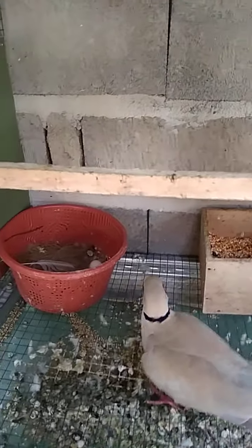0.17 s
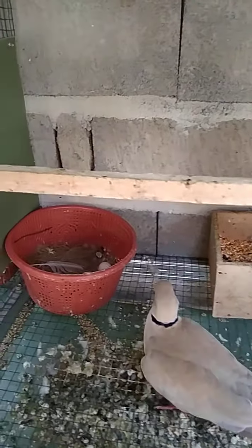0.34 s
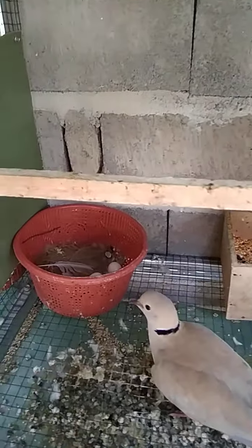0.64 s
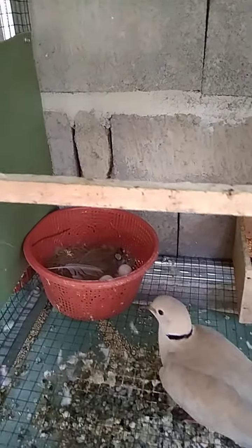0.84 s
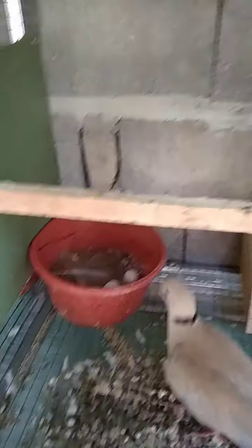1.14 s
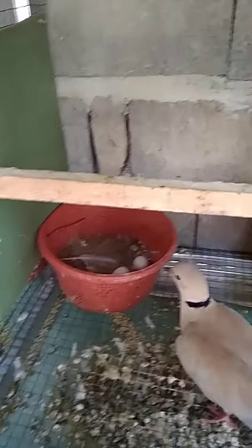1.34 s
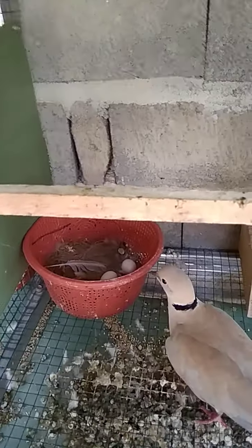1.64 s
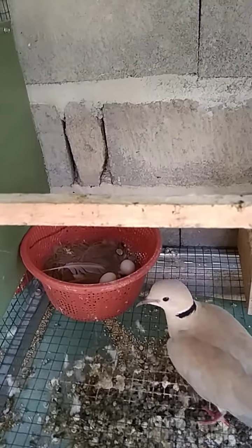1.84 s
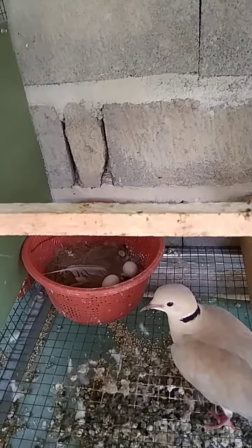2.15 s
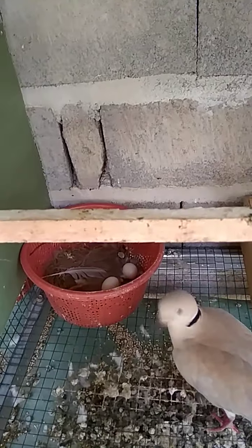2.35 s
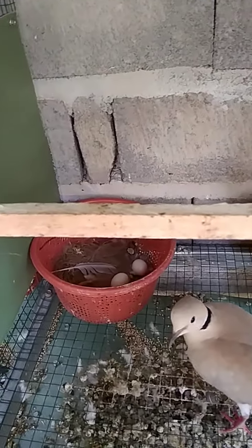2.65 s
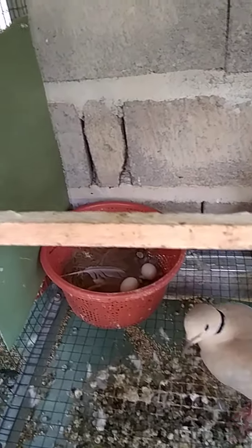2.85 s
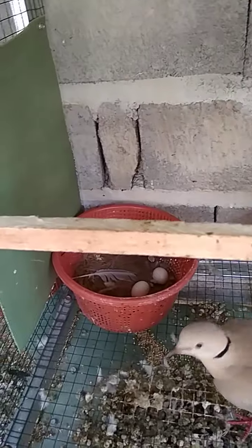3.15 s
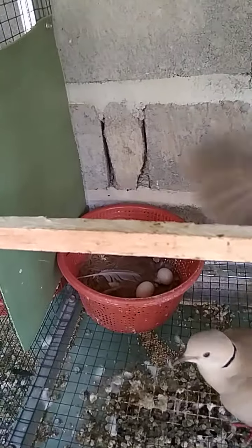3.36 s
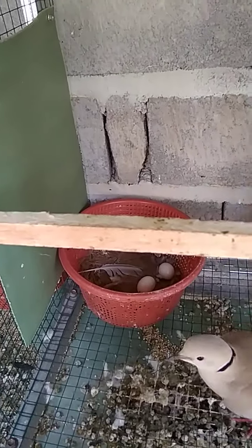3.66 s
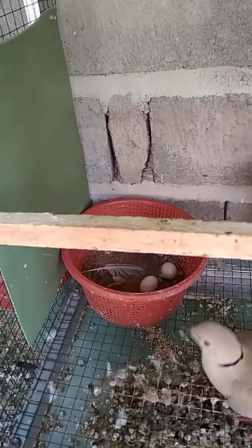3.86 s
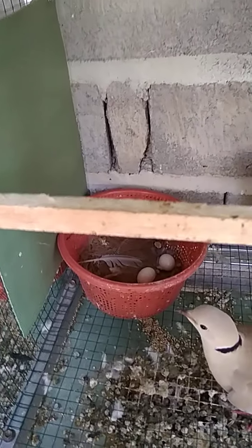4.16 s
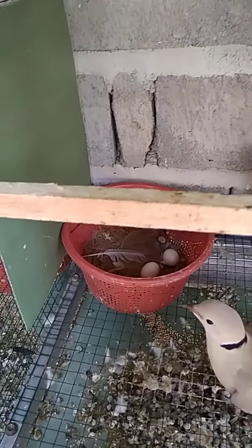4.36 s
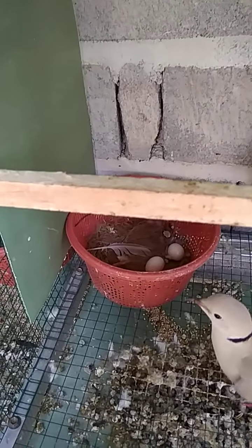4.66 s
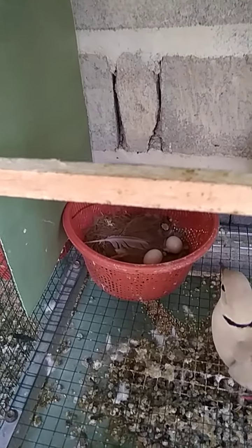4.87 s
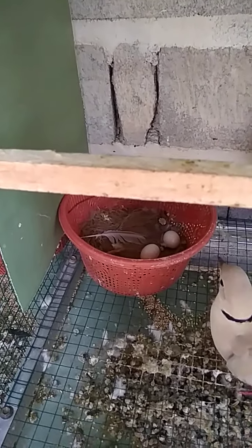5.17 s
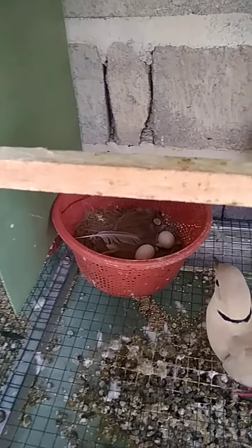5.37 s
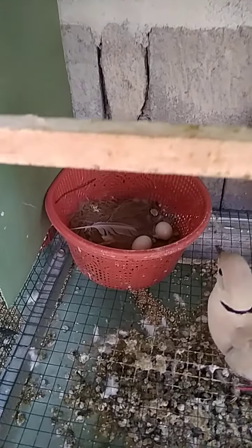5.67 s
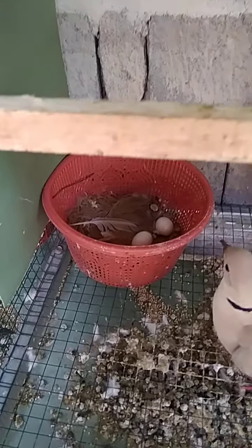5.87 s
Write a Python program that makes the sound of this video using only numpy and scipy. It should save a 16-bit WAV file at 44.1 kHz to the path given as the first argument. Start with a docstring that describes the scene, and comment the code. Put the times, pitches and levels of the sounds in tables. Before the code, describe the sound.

Doves shuffle in a wire cage, feathers hissing and claws clicking on mesh, one hard wing flurry, brief bird chirps and a distant coo.

```python
"""Doves shuffle in a wire cage in a walled yard, close and from the left, over a low air push and a far murmur.
From the start feathers hiss in bursts (crackling noise), claws click on the mesh (short damped rings), bodies
ring the cage and wing draughts thump low (resonated noise); soon a small bird chirps (gliding tone and buzz).
At 1.6 s a far dove coos (unsteady tone with weak overtones); the wings beat hardest at 3.2 s. The chirp
returns at 4.1 s, and from 4.6 s another bird whistles faintly (swelling glides)."""
import sys
import numpy as np
from scipy import signal
from scipy.io import wavfile

SR = 44100
rng = np.random.default_rng(int(sys.argv[2]) if len(sys.argv) > 2 else 0)


def log_audio(samples):
    """Write samples as a 16-bit WAV file to the path given in sys.argv[1]."""
    # one column per channel
    frames = np.atleast_2d(samples).T
    # limit to full scale, then quantise
    limited = np.clip(frames, -1, 1)
    pcm = np.round(limited * 32767).astype(np.int16)
    wavfile.write(sys.argv[1], SR, pcm)


N = 264952

# Noise spectrum of feathers. Each row: pitch in Hz, relative density in dB.
FEATHER_COLOUR = [(880, -39), (1500, -9), (2110, -0.5), (3930, -5.5), (4800, -5), (5580, -11), (8510, -3),
                  (10600, -0.5), (11500, -3.5), (12500, -4), (15500, -9.5), (16000, -9), (16500, -31)]
# Wing strokes and claw ticks. Each row: start in seconds, level in dB, hold in seconds, t60 in seconds, then
# against that level: body on the cage in dB, dull part in dB, tick in dB.
WING_STROKES = [(.06, -60.5, 0.02, 0.23, 0.5, -12, -13), (.091, -69.5, 0.0051, 0.48, 10.5, -5, 12.5),
                (.232, -67.5, 0.032, 0.56, -21, -19, -10), (0.278, -71, 0.01, .24, -31.5, -26, 10),
                (0.7062, -45, .012, 0.33, -10.5, -9.5, -5), (0.8471, -47.5, 0.0047, 0.25, -1.5, -6.5, -2),
                (1.198, -95.5, 0.0084, 0.47, 2, 24, 8), (1.338, -68.5, 0.017, 0.28, -4, -37.5, 2),
                (1.528, -65, .007, 0.23, -24, -34, 10), (1.6, -54.5, 0.0075, 0.24, -43, -6.5, 2),
                (1.8964, -77.5, 0.016, .3, -12.5, -39, 2), (2.0677, -74.5, 0.0088, 0.9, 8.5, -21, -10),
                (2.278, -62.5, 0.0065, 0.47, -21, -9, 7.5), (2.375, -68, .008, 0.77, 8.5, -6, 11),
                (2.6608, -64.5, 0.012, 0.86, -4.5, -8.5, -43), (2.715, -55.5, 0.0087, 0.55, -3, -6.5, 7.5),
                (2.795, -56, 0.026, 0.2, -9, -8, -8), (2.868, -54, .008, .2, -10, -8, -20),
                (2.875, -46.5, 0.011, 0.32, -5.5, -10.5, -20), (2.937, -50.5, 0.015, 1, -7, -4, -16),
                (3.0873, -52, .03, 0.75, -6, -27, 7), (3.172, -31, 0.026, 0.092, -14.5, -8.5, -8.5),
                (3.189, -27.5, 0.0065, 0.045, -20.5, -24, -11.5),
                (3.1946, -29, 0.008, 0.037, -28, -26, -20), (3.2293, -38.5, 0.037, 0.14, -6.5, -7, -5),
                (3.2714, -44, 0.0075, 0.27, 1.5, -3, -3), (3.306, -42.5, 0.017, 0.17, -18, -13.5, -3),
                (3.39, -64.5, 0.0094, 0.13, 11.5, 5.5, 1), (3.4033, -67, 0.0046, 0.85, -18.5, -15, 26),
                (3.455, -60, 0.026, .3, -12, -9, -20), (3.5345, -38.5, 0.0069, 0.21, -10, -11.5, -1),
                (3.694, -55, 0.004, 0.15, -22, -13, 12), (3.7055, -57.5, .003, .2, -20, -16, 16),
                (3.7306, -50.5, 0.0094, 0.29, 0.5, -7.5, -10), (3.8332, -66.5, 0.0064, 0.098, -21, -37, 17),
                (3.8866, -45.5, 0.0032, 0.078, -6, -9, 17), (3.929, -51, 0.0044, 0.22, -5, -12.5, -2),
                (4.019, -54.5, 0.0096, 0.5, 2, -8.5, -5), (4.0718, -50, 0.0052, 0.28, -4, -6, -5),
                (4.3242, -42.5, 0.023, 0.58, -4, -8.5, 11.5), (4.375, -45, 0.0089, 0.26, -5, -9.5, 11),
                (4.458, -51.5, 0.017, 0.096, -1.5, -5, 6), (4.561, -51.5, .006, 0.52, -26, -38, -8),
                (4.797, -55.5, 0.018, 0.24, -12.5, -6.5, 1), (5.0, -71, 0.03, 0.61, -30.5, -34, -30),
                (5.033, -54, 0.033, 0.193, -29, -32, -3), (5.0516, -51, 0.025, 0.3, -0.5, -3, -22),
                (5.0865, -77, 0.014, 0.35, -2, 3, -5.5), (5.1523, -55, 0.0078, 0.18, -2.5, -10, 3.5),
                (5.445, -66.5, 0.007, 0.26, -21, -32, 18.5), (5.7034, -56, 0.025, 0.4, -17.5, -13, -7.5),
                (5.8609, -57, .01, 0.4, -1.5, -13, 8), (5.9346, -58, 0.0063, 0.2, -2.5, -10, 10)]
# Knocks on the cage. Each row: start in seconds, body level in dB, body t60 in seconds, slat pitch in Hz,
# slat ring level in dB.
CAGE_KNOCKS = [(0.711, -54.5, 0.58, 830, -50), (1.199, -72, 0.22, 1282, -46),
               (1.393, -71.5, 0.78, 674, -44), (2.945, -54.5, .6, 866, -54), (2.984, -44, 0.67, 872, -41.5),
               (3.179, -38.5, 0.26, 489, -24), (3.226, -57, 0.24, 488, -27), (3.886, -56.5, .12, 2007, -43),
               (4.323, -70.5, .1, 2130, -45), (4.326, -59.5, 0.2, 573, -44.5),
               (4.807, -60, 0.45, 1492, -54), (5.046, -51.5, 0.42, 598, -53),
               (5.056, -50.5, 0.4, 1146, -42), (5.062, -54, 0.4, 1494, -42), (5.07, -63, 0.33, 843, -46.5),
               (5.398, -88, 0.17, 846, -71), (5.478, -74, 0.42, 857, -54), (5.488, -66.5, .2, 1095, -50.5),
               (5.782, -79, 0.36, 871, -66), (5.871, -57.5, 0.31, 690, -43.5)]


def amp(db):
    """Gain of a dB value."""
    return 10 ** (np.asarray(db) / 20)


def unit(x):
    """Scale to rms 1."""
    return x / np.sqrt(np.mean(x ** 2) + 1e-20)


def in_time(rows):
    """Columns of a curve table, interpolated to one value a sample."""
    s, *columns = np.transpose(rows)
    return [np.interp(np.arange(N) / SR, s, c) for c in columns]


def sounding(rows):
    """1 within the time span of a table, 0 outside, with 40 ms ramps."""
    t = np.arange(N) / SR
    return np.clip(np.minimum(t - rows[0][0], rows[-1][0] - t) / 0.04, 0, 1)


def at_hz(points, hz):
    """Read a spectrum on a log-frequency axis."""
    point_hz, values = np.array(points).T
    return np.interp(np.log(hz), np.log(point_hz), values)


def drift(rate_hz):
    """Slow random curve of spread 1: noise through two poles at rate_hz, drawn every 40 samples."""
    r = np.exp(-80 * np.pi * rate_hz / SR)
    noise = rng.standard_normal(N // 40 + 1002)
    slow = signal.lfilter([1], [1, -2 * r, r * r], noise)[1000:]
    return np.interp(np.arange(N) / 40, np.arange(len(slow)), unit(slow))


def phase_of(hz):
    """Phase in radians of a tone whose pitch moves."""
    return 2 * np.pi * np.cumsum(hz) / SR


def lean(db):
    """Left and right gains for a left-right difference."""
    return amp(np.array([db / 2, -db / 2]))


def bandpass(x, order, low_hz, top_hz):
    """Butterworth band-pass."""
    return signal.sosfilt(signal.butter(order, [low_hz, top_hz], "band", fs=SR, output="sos"), x)


def modes(x, table):
    """Parallel resonances with alternating signs, scaled to rms 1."""
    out = 0
    for k, (hz, width_hz, db) in enumerate(table):
        r = np.exp(-np.pi * width_hz / SR)
        poles = [1, -2 * r * np.cos(2 * np.pi * hz / SR), r * r]
        out = out + (-1) ** k * amp(db) * signal.lfilter([1 - r, 0, r - 1], poles, x)
    return unit(out)


def stereo_noise(hz):
    """Two white noises with the left-right likeness and level difference set for that pitch."""
    # Each row: pitch in Hz, left-right correlation.
    likeness = [(60, 1), (180, 1), (550, 0.31), (1100, 0.021), (1900, -0.13), (4970, -0.0042),
                (15000, -0.0)]
    # Each row: pitch in Hz, left-right difference in dB.
    leaning = [(40, 8), (110, 5.5), (200, 6), (380, 4.5), (700, 9), (1290, 8), (2380, 5.5), (4400, 3.5),
               (8120, 6), (15000, 0)]
    mid, side = rng.standard_normal((2, N))
    alike = np.clip(at_hz(likeness, hz), -1, 1)
    pair = np.sqrt(1 + alike) * mid + np.sqrt(1 - alike) * side * [[1], [-1]]
    return pair * lean(at_hz(leaning, hz))[:, None]


def banded(spectrum, low_hz, top_hz, patchy_db, rate_hz, per_octave=3, sheen_db=0.):
    """Bands of stereo noise, each flickering on its own; left-right mean scaled to spread 1."""
    edges = np.geomspace(low_hz, top_hz, round(per_octave * np.log2(top_hz / low_hz)) + 1)
    out = 0
    for a, b in zip(edges, edges[1:]):
        hz = np.sqrt(a * b)
        band = bandpass(stereo_noise(hz), 3, a, b)
        tilt_db = sheen_db * np.log2(hz / 9000)
        out = out + band * amp(at_hz(spectrum, hz) + patchy_db * drift(rate_hz) + tilt_db)
    return out / np.std(out.mean(axis=0))


def burst(s, db, t60, held=0., rise=0.0011):
    """Envelope of one event: quick rise, hold, exponential fall; times in seconds."""
    out, first = np.zeros(N), round(s * SR)
    t = np.arange(min(N - first, round((held + t60) * SR))) / SR
    fall_db = -60 * np.maximum(t - held, 0) / t60
    out[first:first + len(t)] = amp(db + fall_db) * np.clip(t / rise, 0, 1)
    return out


def swell(s, length, peak_at=0.51):
    """Smooth rise and fall of height 1 from s on; peak_at is a share of the length."""
    u = np.clip((np.arange(N) / SR - s) / length, 0, 1)
    bend = np.log(.5) / np.log(np.clip(peak_at, .05, .95))
    return np.sin(np.pi * u ** bend) ** 2


def slat(s, db, hz, t60):
    """A struck slat or wire: one short damped ring."""
    t = np.arange(N) / SR - s
    return burst(s, db, t60, rise=0.0012) * np.sin(2 * np.pi * hz * t)


def echoes(x, t60, wet_db):
    """Walls of the yard: a dense dying spray of reflections, another for each ear."""
    t = np.arange(round(.4 * SR)) / SR
    spray = rng.standard_normal((2, len(t))) * amp(-60 * t / t60)
    spray = amp(wet_db) * spray / np.sqrt(np.sum(spray ** 2, axis=1, keepdims=True))
    return x + signal.fftconvolve(x[None], spray, axes=1)[:, :N]


def murmur():
    """Far murmur of the yard as flickering noise: its body and its thin upper fringe."""
    # Each row: time in seconds, body level in dB before the cage, fringe level in dB.
    murmur_curve = [(0, -59.5, -74.5), (.15, -76, -76), (.38, -56.5, -108), (.62, -65.5, -70),
                    (.83, -60.5, -63), (1.02, -70, -83), (1.25, -81.5, -106.5), (1.36, -54.5, -100),
                    (1.62, -68, -91), (1.82, -60.5, -89), (2.15, -58, -73.5), (2.39, -63.5, -77),
                    (2.69, -53.5, -85), (2.87, -54, -73), (3.2, -57, -72), (3.5, -64, -83),
                    (3.71, -62, -65.5), (3.98, -65, -89), (4.3, -57.5, -82), (4.7, -63, -79.5),
                    (4.89, -65, -80), (5.04, -99, -100), (5.75, -97.5, -100.5), (5.89, -66, -98),
                    (6.01, -67.5, -93)]
    # Each row: pitch in Hz, relative density in dB.
    murmur_colour = [(330, -51), (560, -21), (608, -8.5), (735, -6.5), (937, -7), (1460, -7.5), (1570, -16),
                     (1900, -7.5), (2300, -11.5), (2990, -57), (5060, -120)]
    body_db, fringe_db = in_time(murmur_curve)
    body = amp(body_db) * banded(murmur_colour, 594.0, 2076, patchy_db=4.5, rate_hz=14, per_octave=6)
    fringe = amp(fringe_db) * banded(FEATHER_COLOUR, 2050, 3600, patchy_db=4.0, rate_hz=12, per_octave=6)
    return body, fringe


def whistles():
    """Thin distant notes, each a glide that levels off, under one swell."""
    # Each row: start in seconds, length in seconds, first pitch in Hz, last pitch in Hz, level in dB.
    notes = [(4.64, .09, 3110, 3080, -82), (4.708, 0.097, 2860, 2830, -75), (5.366, 0.069, 3270, 3260, -89),
             (5.437, 0.178, 2806, 2607, -69), (5.608, 0.08, 3000, 3120, -86),
             (5.711, 0.081, 3330, 3300, -77), (5.789, 0.077, 4000, 3900, -78)]
    peaks_at, glides_for = 0.21, 0.42   # shares of the length
    out = np.zeros(N)
    for s, length, first_hz, last_hz, db in notes:
        hz, = in_time([(s, first_hz), (s + glides_for * length, last_hz)])
        tone = np.sin(phase_of(hz * (1 + 0.022 * drift(120))))
        out += amp(db) * tone * swell(s, length, peaks_at)
    return echoes(out, t60=0.2, wet_db=8) * lean(10.4)[:, None]


def coo():
    """A hollow, slightly unsteady held tone with weak overtones and, at times, a tone half-way between."""
    # Each row: time in seconds, pitch in Hz, level in dB, overtones in dB, tone at 3/2 of the pitch in dB.
    coo_curve = [(1.615, 730, -85, -90, -67), (1.636, 719, -65, -89, -52), (1.656, 729.6, -52, -64, -79),
                 (1.712, 737, -47, -63, -70), (1.745, 721, -56, -61, -81), (1.8, 731, -55, -62, -67),
                 (1.85, 713, -58, -65, -67), (1.89, 727, -61, -67, -68), (1.92, 746, -46, -67, -66),
                 (1.945, 725, -55, -70, -74), (1.975, 725, -43.5, -58, -65), (1.997, 725, -68, -68, -71),
                 (2.034, 701, -46.5, -61, -73), (2.06, 739, -66, -63, -74), (2.14, 748, -57, -70, -71)]
    hz, db, octave_db, half_db = in_time(coo_curve)
    phase = phase_of(hz * (1 + 0.012 * drift(33)))
    breath = .6 * drift(60)   # air noise blurs the overtones
    tone = amp(db + 1.2 * drift(30)) * np.sin(phase)
    overtones = np.sin(2 * phase + breath) + amp(-9.0) * np.sin(3 * phase + 2 * breath)
    tone += amp(octave_db) * overtones
    tone += amp(half_db) * np.sin(3 * phase / 2)
    return echoes(tone * sounding(coo_curve), t60=0.45, wet_db=-5.5) * lean(7.8)[:, None]


def chirps():
    """Two sides of the throat: one sings the tune, the other buzzes about it; both throb, and echoes follow."""
    # Each row: seconds after the start, pitch in Hz and level in dB the first time, the same the second time.
    tune = [(-.01, 3342, -54, 3310, -50), (.012, 3692, -53.5, 3318, -53.5), (.027, 4206, -49.5, 3476, -61),
            (.038, 3363, -54.5, 3577, -52.5), (.048, 3890, -51.5, 4130, -50.5),
            (.068, 4470, -38.5, 4312, -42), (.081, 2620, -54, 2628, -51), (0.092, 2956, -46.5, 2877, -45),
            (0.103, 3328, -39.5, 3370, -38.5), (0.119, 3268, -36, 3282, -37),
            (.126, 3990, -36.5, 4093, -41), (.141, 4118, -38.5, 4286, -38.5),
            (.152, 3637, -43, 3770, -36.5), (.168, 3191, -38, 3156, -46.5), (.182, 2814, -47, 2743, -46),
            (.189, 3370, -35.5, 3677, -40.5), (0.204, 3346, -44.5, 3590, -35),
            (.222, 3230, -39.5, 3404, -46), (0.244, 3150, -68.5, 3050, -53), (0.261, 3280, -46, 3230, -48),
            (.287, 3220, -58, 3280, -52)]
    # The two starts in seconds.
    starts_s = [0.41, 4.061]
    buzz_db, octave_db = -7, -25   # against the tune
    rasp_hz, rasp_depth = 230, .5
    chirp_low_hz, chirp_top_hz = 2620, 4650   # band of tune and buzz
    voices, octave = np.zeros((2, N))
    for k, s in enumerate(starts_s):
        rows = np.array(tune)[:, [0, 1 + 2 * k, 2 + 2 * k]] + [s, 0, 0]
        hz, db = in_time(rows)
        phase = phase_of(hz * (1 + 0.014 * drift(150)))
        warble = np.sin(phase_of(60 * (1 + 0.21 * drift(20))))
        buzz = np.sin(phase_of(.4 * hz + 2150 + 620 * warble))
        rasp = 1 + rasp_depth * np.sin(phase_of(rasp_hz * (1 + .3 * drift(60))))
        gain = amp(db - 0.2 + 0.96 * drift(90)) * rasp * sounding(rows)
        voices += gain * (np.sin(phase) + amp(buzz_db) * buzz)
        octave += gain * amp(octave_db) * np.sin(2 * phase + 2 * drift(200))
    voices = bandpass(voices, 8, chirp_low_hz, chirp_top_hz)
    return echoes(voices + octave, t60=0.22, wet_db=4) * lean(6.2)[:, None]


def rumble(touch):
    """Low air push, and the cage's boom and thud, as noise; wing draughts and bodies raise their power."""
    # Each row: time in seconds, level in dB.
    air_curve = [(0.0, -67.5), (0.32, -49), (0.48, -77), (0.85, -65), (1.1, -80.5), (1.82, -67.5),
                 (2.31, -54), (2.86, -60.5), (3.38, -58.5), (3.86, -65.5), (4.07, -64), (4.3, -59),
                 (5.17, -82.5), (5.74, -83), (5.92, -71), (6.01, -68)]
    # Each row: pitch in Hz, relative density in dB.
    air_colour = [(12, -42), (24, -24.5), (45, -14.5), (91, -14.5), (110, -7.5), (140, -31), (240, -120)]
    # Each row: time in seconds, upper boom in dB, lowest standing wave against it in dB.
    boom_curve = [(0, -71.5, 3), (.32, -62.5, -14.5), (.55, -69, -4), (.93, -74, 1.5), (1.2, -77.5, -12),
                  (1.45, -81.5, -3), (1.78, -67, -31.5), (2.02, -62, 8.5), (2.2, -55, -6.5),
                  (2.6, -56, -9.5), (2.81, -55, -19), (3.21, -42.5, -17), (3.6, -51.5, -8.5),
                  (3.96, -62, -7.5), (4.1, -58.5, -3.5), (4.43, -51, -10), (4.67, -61, 2), (4.8, -60.5, -1),
                  (4.93, -91, -1.5), (5.15, -74.5, -1), (5.35, -90.5, -3.5), (5.69, -88.5, -4),
                  (6.01, -71.5, 2)]
    # Wing draughts. Each row: middle in seconds, length in seconds, then levels in dB of air, lowest standing
    # wave, upper boom and thud.
    draughts = [(0.153, 0.074, -51, -60, -53.5, -70), (0.301, 0.24, -44.5, -54, -80, -73),
                (0.447, 0.18, -57.5, -61, -63.5, -68), (0.787, 0.52, -74.5, -62, -86.5, -86),
                (1.003, 0.2, -82.5, -76, -55, -70.5), (1.392, 0.43, -78, -88, -63, -73),
                (1.921, 0.28, -67, -52, -57.5, -99), (2.132, 0.15, -56, -72, -52.5, -91),
                (2.359, 0.55, -63, -47, -67, -96), (2.695, 0.12, -60, -69, -50, -67),
                (2.865, 0.23, -54, -56, -54, -83), (3.068, 0.33, -69, -54, -43.5, -51.5),
                (3.202, 0.2, -50, -59, -34, -49), (3.326, 0.14, -50, -45.5, -42, -53),
                (3.54, 0.19, -70, -68, -68, -57), (3.715, 0.24, -63, -70, -52.5, -61.5),
                (4.016, 0.036, -68, -55, -48, -85), (4.307, 0.4, -54, -60, -49, -57),
                (4.391, 0.16, -72, -34.5, -50, -52), (4.492, 0.23, -57, -65, -60, -51.5),
                (4.7, 0.13, -56, -57.5, -66, -62), (5.111, 0.18, -68.5, -58, -64.5, -72),
                (5.82, 0.32, -64.5, -70.5, -84, -97), (6.008, 0.055, -46, -56, -80, -80)]
    # Resonances. Each row: pitch in Hz, width in Hz at one pass, level in dB.
    lowest_mode = [(131.2, 12, 0)]
    upper_modes = [(160.2, 24, 9), (252, 56, 4), (307, 68, -1), (373, 54, -6)]
    thud_modes = [(415.8, 57, 1), (490.2, 11, 5), (535.5, 45, -0.5)]
    lumps_db, lumps_hz = 2, 3.6
    thud_to_boom_db, thud_to_body_db = -25.5, -13

    air_db, = in_time(air_curve)
    boom_db, lowest_db = in_time(boom_curve)
    lumpy_db = [boom_db + lumps_db * drift(lumps_hz) for _ in range(2)]
    power = amp([air_db, lumpy_db[0] + lowest_db, lumpy_db[1], boom_db + thud_to_boom_db]) ** 2
    for middle_s, length, *db in draughts:
        power += (amp(db)[:, None] * swell(middle_s - length / 2, length)) ** 2
    air_gain, lowest_gain, upper_gain, thud_gain = np.sqrt(power)
    thud_gain = np.hypot(thud_gain, amp(thud_to_body_db) * touch)

    air = air_gain * banded(air_colour, 22, 108.9, patchy_db=3.0, rate_hz=7.7)
    lowest = lowest_gain * modes(modes(stereo_noise(180), lowest_mode), lowest_mode)
    upper = upper_gain * bandpass(modes(stereo_noise(250), upper_modes), 3, 150, 420)
    thud = thud_gain * modes(modes(stereo_noise(550), thud_modes), thud_modes)
    return air + lowest + upper + thud


def contacts():
    """Envelope of bodies against the mesh: powers of strokes and knocks add."""
    power = np.zeros(N)
    for s, db, held, t60, body_db, *_ in WING_STROKES:
        power += burst(s, db + body_db, t60, held, rise=0.0052) ** 2
    for s, db, t60, *_ in CAGE_KNOCKS:
        power += burst(s, db, t60, rise=0.0029) ** 2
    return np.sqrt(power)


def cage(touch):
    """Murmur, bodies on the mesh and struck slats all ring the standing waves of the cage."""
    # Body noise. Each row: pitch in Hz, relative density in dB.
    body_colour = [(220, -34), (380, -13), (493, -3.5), (564, -9.5), (810, -8), (876, -3.5), (948, -8.5),
                   (2500, -9.5), (3250, -44), (5500, -120)]
    # Standing waves between the walls. Each row: pitch in Hz, width in Hz, level in dB.
    standing_waves = [(474.6, 8.6, -5.5), (627, 16, 6), (745.7, 34, -2), (881.8, 18, 7.5), (998, 15, 0),
                      (1135, 43, 3), (1250, 260, -10), (1456, 140, 1.5), (1830, 120, -10.5),
                      (2230, 200, -7)]
    slat_t60_s = 0.053
    rings = sum(slat(s, ring_db, hz, slat_t60_s) for s, _, _, hz, ring_db in CAGE_KNOCKS)
    far, fringe = murmur()
    bodies = touch * banded(body_colour, 557, 2155, patchy_db=1.5, rate_hz=15)
    direct = far + bodies + echoes(rings, t60=0.23, wet_db=0.0) * lean(1.9)[:, None]
    ringing = np.std(direct) * modes(direct, standing_waves)
    return amp(-5.5) * direct + amp(-3.0) * ringing + fringe


def clicks():
    """Claws catch a wire: a snap that rings for a few milliseconds."""
    # Each row: start in seconds, level in dB, pitch in Hz.
    snap_rows = [(.2765, -47, 9500), (1.2024, -43, 4250), (1.531, -36, 10900), (1.5989, -32, 7600),
                 (3.4034, -27, 7600), (3.5368, -21.5, 4450), (3.8864, -16, 10300), (4.3256, -25, 10200),
                 (4.561, -48, 11100), (5.057, -27, 2010), (5.4455, -35, 10400)]
    click_t60_s = 0.004
    snaps = sum(slat(s, db, hz, click_t60_s) for s, db, hz in snap_rows)
    return echoes(snaps, t60=0.085, wet_db=-3.0) * lean(9.9)[:, None]


def crackle():
    """Gain that jumps briefly wherever barbs snap apart."""
    snaps_per_s, snap_db, snap_t60_s = 600, -9, .004
    hits = rng.random(N) < snaps_per_s / SR
    snaps = hits * amp(snap_db) * np.minimum(rng.exponential(1, N), 3)
    decay = amp(-60 / (snap_t60_s * SR))
    return unit(1 + signal.lfilter([1], [1, -decay], snaps))


def feathers():
    """Barbs slide over each other: grainy hiss, bright and dull, each stroke with a tick on its front."""
    # Steady rustle. Each row: time in seconds, level in dB, dull part against it in dB.
    rustle = [(0, -69, -4), (.13, -86, -28), (.3, -82.5, 3.5), (.58, -57, -2), (.68, -73, -13.5),
              (.74, -47, -20), (.8, -96, 1), (.97, -88.5, -7), (1.4, -90.5, -11), (1.55, -84.5, 0),
              (1.91, -88.5, -4.5), (2.14, -80.5, -6), (2.69, -80.5, -2), (2.88, -72, 0), (3.11, -60, -10),
              (3.26, -59.5, -7), (3.51, -56.5, -16), (3.81, -65, -13), (4.25, -48.5, -11.5),
              (4.35, -55.5, 0), (4.65, -77, -13.5), (4.8, -89.5, -9), (5.47, -89.5, -10.5), (5.85, -81, -3),
              (5.92, -71, 5), (6.01, -58, -12)]
    # Where the rustling birds are. Each row: time in seconds, extra left-right difference in dB.
    place = [(0, 4.5), (.8, 2.5), (1.6, 1.5), (2.5, 4), (3.15, -0.5), (3.6, 1.5), (4.3, 0.9), (5, 1.5),
             (5.5, 1.5), (6.01, 5)]
    # Treble tilt. Each row: time in seconds, tilt in dB per octave.
    sheen = [(0, 8.5), (.2, 4.5), (.4, 5), (.7, -1), (1, -3.5), (1.35, 12), (1.6, -8), (1.85, -5), (2.1, 9),
             (2.3, 1.5), (2.6, 5.5), (2.8, -2), (2.95, -1.5), (3.1, 2), (3.17, 7.5), (3.205, 6),
             (3.23, -2.5), (3.28, -0.5), (3.32, 6.5), (3.37, 1.5), (3.45, 5.5), (3.55, -8), (3.75, 2.5),
             (3.9, -0.5), (4.1, -2.5), (4.35, -1), (4.6, 2), (4.85, -2.5), (5.08, 0), (5.3, -2),
             (5.5, -0.5), (5.75, 6), (6.01, -3.5)]
    stroke_rise_s, tick_rise_s, tick_t60_s = 0.0064, 0.00056, 0.021

    level_db, dull_bed_db = in_time(rustle)
    bright_power = amp(level_db) ** 2
    dull_power = bright_power * amp(dull_bed_db) ** 2
    for s, db, held, t60, _, dull_db, tick_db in WING_STROKES:
        stroke = burst(s, db, t60, held, stroke_rise_s)
        tick = burst(s, db + tick_db, tick_t60_s, rise=tick_rise_s)
        power = (stroke + tick) ** 2
        bright_power += power
        dull_power += power * amp(dull_db) ** 2

    sheen_db, = in_time(sheen)
    place_db, = in_time(place)
    bright = banded(FEATHER_COLOUR, 5600, 16600, patchy_db=3.5, rate_hz=32, per_octave=6, sheen_db=sheen_db)
    dull = banded(FEATHER_COLOUR, 2000, 5600, patchy_db=2.5, rate_hz=13, per_octave=5)
    hiss = np.sqrt(bright_power) * bright + np.sqrt(dull_power) * dull
    return crackle() * lean(place_db) * hiss


def scene():
    """All sources together; rumble and cage share the body contacts."""
    touch = contacts()
    return whistles() + coo() + chirps() + rumble(touch) + cage(touch) + clicks() + feathers()


def record(dry):
    """Steep low-pass, 75 dB down from 16.85 kHz up."""
    return signal.sosfilt(signal.cheby2(14, 75, 16850, fs=SR, output="sos"), dry)


dry = scene()
out = record(dry)
log_audio(out)
```